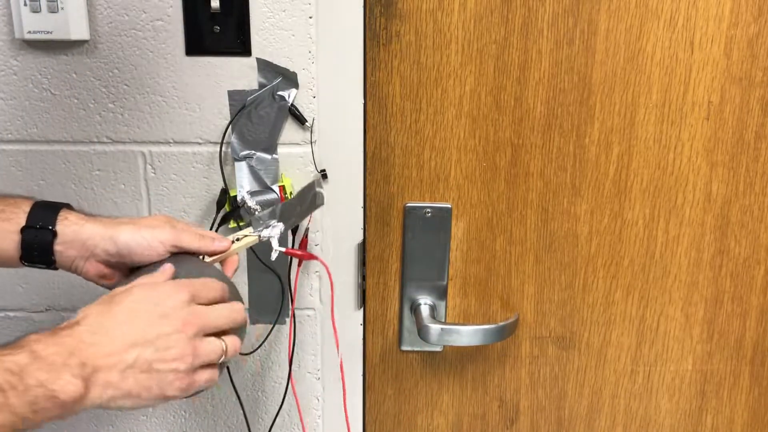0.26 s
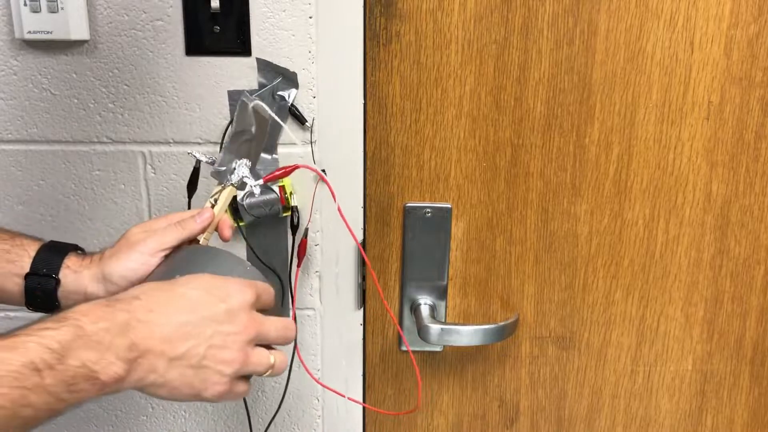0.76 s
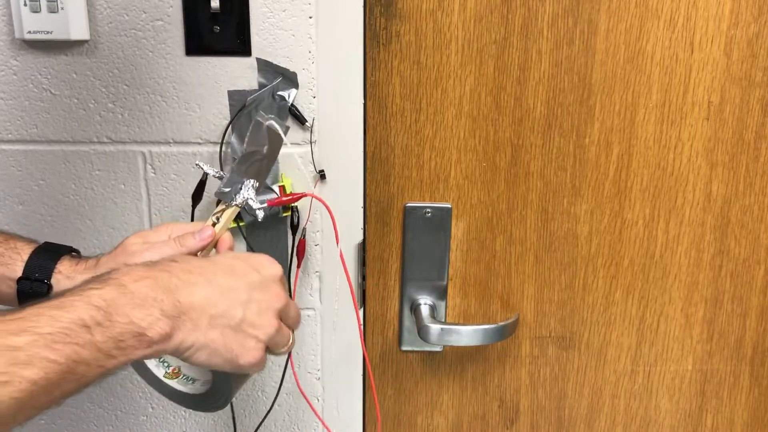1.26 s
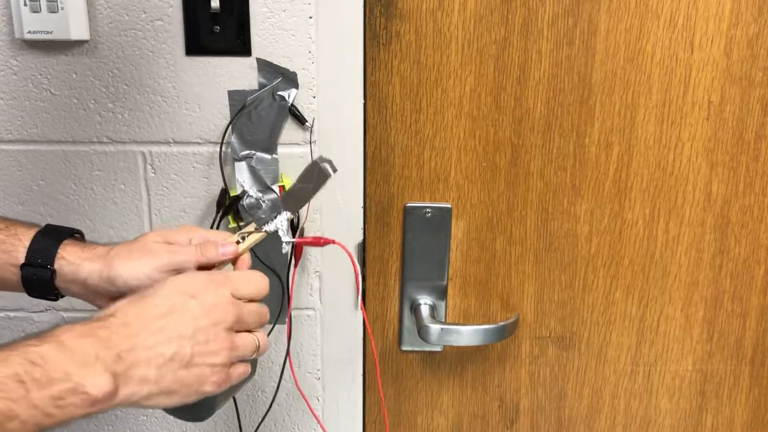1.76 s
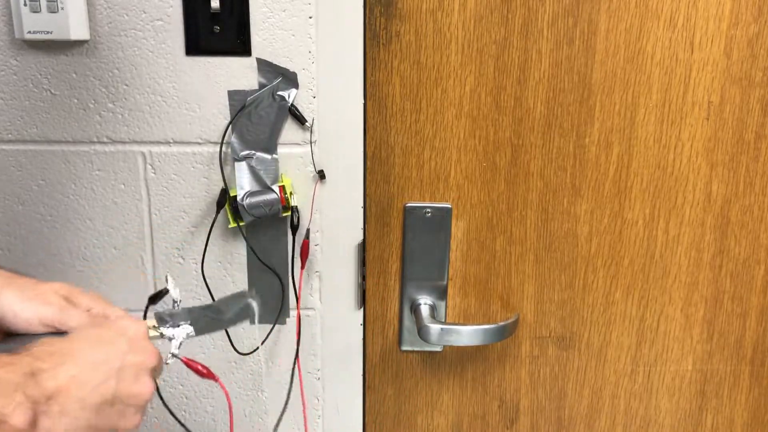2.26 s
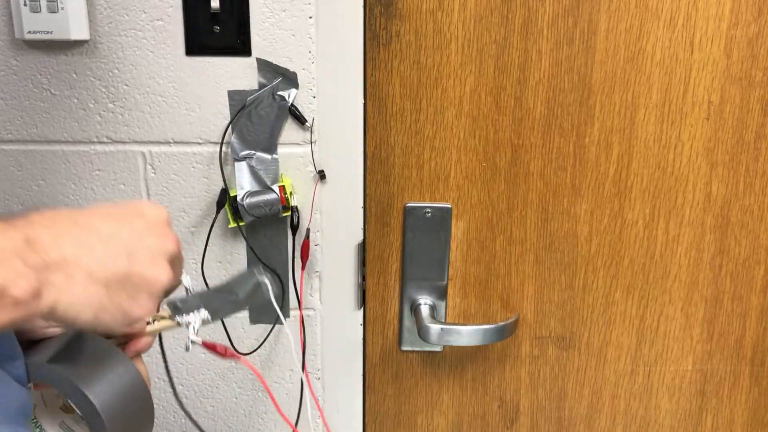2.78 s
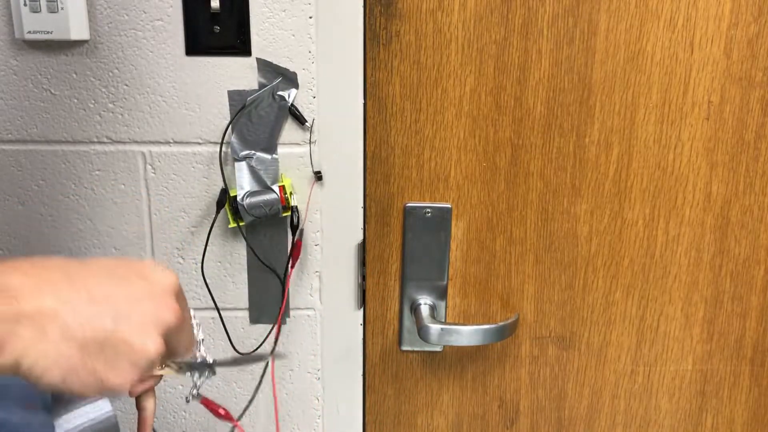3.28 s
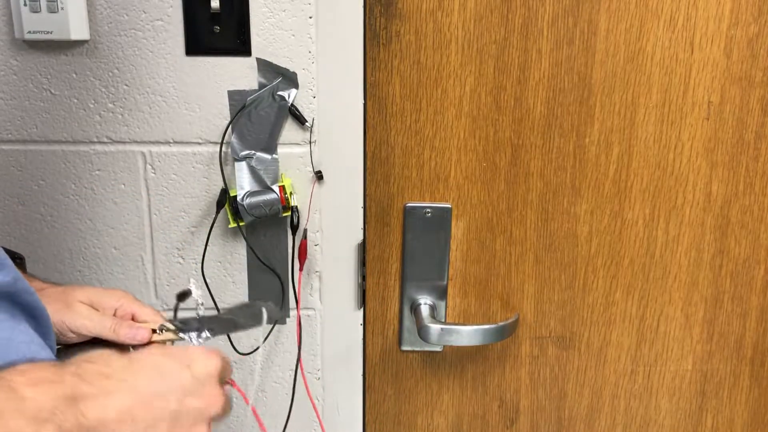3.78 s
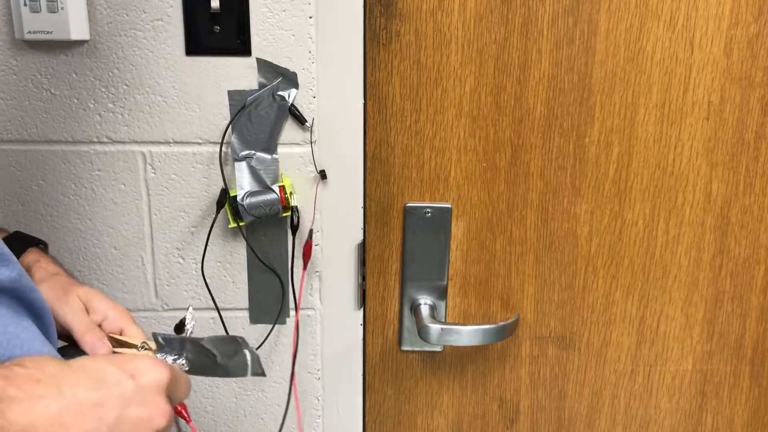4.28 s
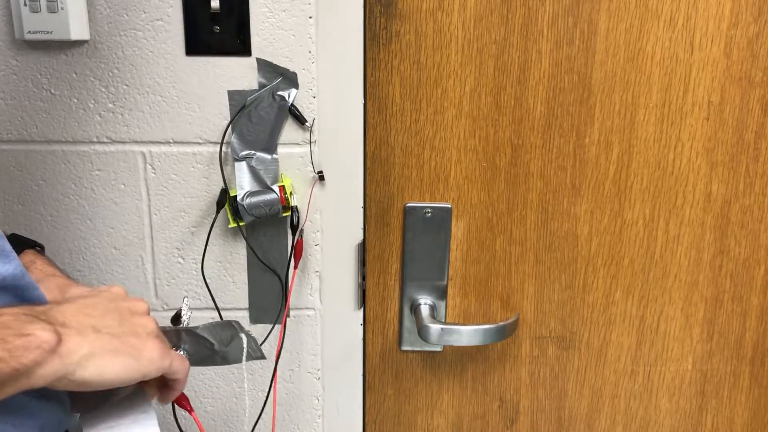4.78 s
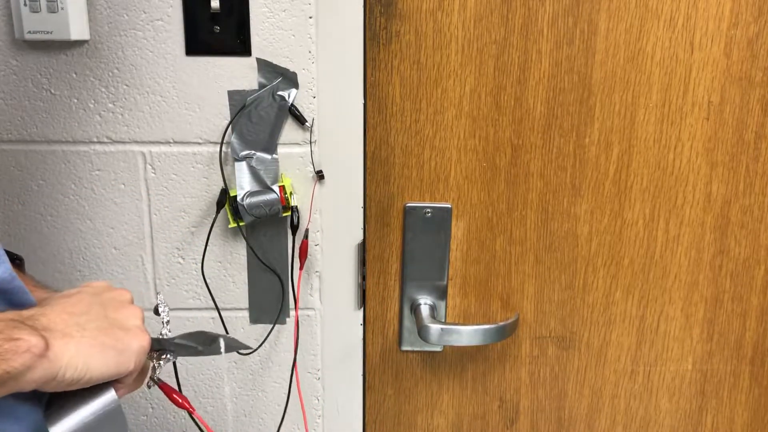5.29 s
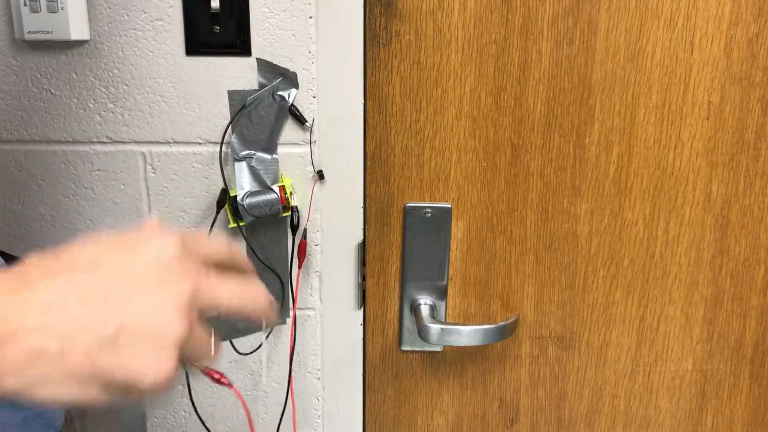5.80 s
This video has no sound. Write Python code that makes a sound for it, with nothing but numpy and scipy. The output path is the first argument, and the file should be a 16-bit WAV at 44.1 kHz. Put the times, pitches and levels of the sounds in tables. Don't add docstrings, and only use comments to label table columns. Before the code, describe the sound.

Cloth tape peels off its roll in short crackling rasps, growing to hard rips, over a low ventilation hum in an echoing corridor.

```python
import sys
import numpy as np
from scipy import signal
from scipy.fft import rfft, irfft
from scipy.io import wavfile
from scipy.ndimage import uniform_filter1d

SR = 44100
rng = np.random.default_rng(int(sys.argv[2]) if len(sys.argv) > 2 else 0)


def store_pcm(level_fs):
    pcm = np.round(np.clip(level_fs, -1, 1) * 32767).astype(np.int16)
    wavfile.write(sys.argv[1], SR, np.atleast_2d(pcm).T)


def decibels_to_gain(level_db):
    exponent = np.asarray(level_db, float) / 20
    return 10 ** exponent


N = 266496


def rms_one(x):
    return x / np.sqrt(np.mean(x ** 2) + 1e-20)


def band(x, low_hz, high_hz):
    edges_hz = [low_hz, min(high_hz, .45 * SR)]
    return signal.sosfilt(signal.butter(2, edges_hz, "band", fs=SR, output="sos"), x)


def resonance(x, hz, width_hz):
    r = np.exp(-np.pi * width_hz / SR)
    zeros = np.array([1, 0, -1]) * (1 - r * r) / 2
    poles = [1, -2 * r * np.cos(2 * np.pi * hz / SR), r * r]
    return signal.lfilter(zeros, poles, x)


def drift(rate_hz, size=N):
    steps = rng.standard_normal(int(size * rate_hz / SR) + 2)
    return np.interp(np.arange(size) * rate_hz / SR, np.arange(len(steps)), steps)


def add(out, s, sound):
    at = round(s * SR)
    out[at:at + len(sound)] += sound[:N - at]


def pulls():
    # t/s, level/dB
    efforts = [
        [(1.58, -66.5), (1.606, -52), (1.634, -44.5), (1.65, -41)],
        [(1.645, -44.5), (1.685, -44.5), (1.7, -43)],
        [(2.3175, -42.5), (2.33, -50.5), (2.355, -53)],
        [(2.364, -45), (2.372, -49), (2.39, -51), (2.41, -60)],
        [(2.419, -45.5), (2.44, -37.5), (2.499, -31.5), (2.535, -42)],
        [(2.863, -34.5), (2.888, -30), (2.92, -33), (2.932, -45), (2.942, -34), (2.952, -42), (2.97, -53)],
        [(3.232, -38), (3.24, -37), (3.272, -33), (3.295, -43.5), (3.305, -36), (3.325, -52), (3.346, -51.5),
         (3.36, -66)],
        [(4.1245, -47), (4.136, -45), (4.154, -55), (4.24, -68.5)],
        [(5.565, -52), (5.581, -35), (5.613, -26), (5.651, -27), (5.67, -30.5)],
    ]
    # f/Hz, width/Hz, level/dB
    strips = [
        [(6930, 420, 8.5)],
        [(3800, 890, 4)],
        [(4470, 750, 13)],
        [(6000, 1200, -4)],
        [(500, 220, 0), (1136, 320, 8), (4200, 670, -9)],
        [(278, 63, 10), (1105, 300, 9), (1360, 250, 10.5)],
        [(228, 75, 4.5), (1040, 110, 1), (1430, 440, 8)],
        [(5650, 250, -9)],
        [(970, 73, -8), (2860, 130, -3), (4300, 150, 0)],
    ]
    # boom at start/dB, boom at end/dB,
    # middle at start/dB, middle at end/dB, sizzle at start/dB
    colours = [(-36, -23, -28, -12, 10.5), (-16, -10, -8, -19, 2.5), (-15, 7, -3, -4, 9),
               (-20, -20, -27, -20, 8), (-32.5, 3.5, -9.5, -7, -1), (-10, 9.5, -1.5, -2.5, -0.5),
               (-10.5, 14, 5.5, -0.5, 5), (-19, -3, -2, 3, 2), (-22.5, -15, 0.5, -14.5, -2.5)]
    # start t/s, peak t/s, end t/s, peak level/dB, ring f/Hz
    light_tugs = [(3.506, 3.517, 3.54, -54, 4300), (3.568, 3.589, 3.615, -56.5, 6920),
                  (4.501, 4.535, 4.575, -52.5, 4460), (4.88, 4.969, 5.08, -69.5, 5500),
                  (2.1, 2.155, 2.22, -71.5, 4000), (5.859, 5.911, 5.94, -49.5, 2600)]
    tug_swell_db, tug_colour = 25, (-12, -1, -6, -0.5, 3)
    tug_width_hz, tug_ring_db = 270, -5
    slips_per_s, clump_rate_hz = 9000, 348.4
    uneven_db, uneven_end_db = 4.5, 3.5
    sizzle_loss_db = 9.5
    bite_s, let_go_s = 0.0029, 0.013

    strokes = list(zip(efforts, colours, strips))
    for start, peak, end, db, hz in light_tugs:
        effort = [(start, db - tug_swell_db), (peak, db), (end, db - tug_swell_db)]
        strokes.append((effort, tug_colour, [(hz, tug_width_hz, tug_ring_db)]))
    out = np.zeros(N)
    for effort, (boom_db, boom_end_db, mid_db, mid_end_db, top_db), modes in strokes:
        s, level_db = np.transpose(effort)
        t = np.arange(s[0], s[-1], 1 / SR)
        freed = (t - s[0]) / (s[-1] - s[0])
        spread_db = uneven_db + (uneven_end_db - uneven_db) * freed
        chance = np.minimum(rng.exponential(1, len(t)), 4) + 0.55 * drift(clump_rate_hz, len(t))
        slips = decibels_to_gain(spread_db * chance) * rng.choice([-1, 1], len(t))
        slips = slips * (rng.random(len(t)) < slips_per_s / SR)
        slips = slips / np.sqrt(uniform_filter1d(slips ** 2, size=600) + 1e-9)
        slips = slips + sum(resonance(slips, hz, width) * decibels_to_gain(db) for hz, width, db in modes)
        parts = [(213, 774, boom_db + (boom_end_db - boom_db) * freed),
                 (845, 3620, mid_db + (mid_end_db - mid_db) * freed),
                 (2410, 6700, 0),
                 (6500, 14300, top_db - sizzle_loss_db * freed)]
        effort_db = np.interp(t, s, level_db)
        pull = np.zeros(len(t))
        for k, (low_hz, high_hz, rel_db) in enumerate(parts):
            sign = (-1) ** k
            pull += sign * rms_one(band(slips, low_hz, high_hz)) * decibels_to_gain(effort_db + rel_db)
        fade = np.clip(np.minimum((t - s[0]) / bite_s, (s[-1] - t) / let_go_s), 0, 1)
        add(out, s[0], pull * fade * decibels_to_gain(-1.5))
    return out


def snap(ring_hz, low_db, top_db, t60, crackle_db):
    t = np.arange(round(.1 * SR)) / SR
    crack = decibels_to_gain(-60 * t / 0.0036)
    crackle = decibels_to_gain(crackle_db - 60 * t / max(t60, .003))
    burst = rng.standard_normal(len(t)) * (crack + crackle)
    burst[0] = 2.0
    body = band(burst + decibels_to_gain(13.5) * resonance(burst, ring_hz, 0.26 * ring_hz), 1870, 9600)
    thud, edge = -band(burst, 840, 1660), -band(burst, 8800, 23000)
    return sum(p / np.abs(p).max() * decibels_to_gain(db) for p, db in [(body, 0), (thud, low_db), (edge, top_db)])


def snaps():
    # t/s, peak level/dB, ring f/Hz, level over 9 kHz relative to body/dB
    lone = [(0.071, -37.5, 7500, 7), (0.2378, -37.5, 4170, -33), (1.397, -47.5, 7500, -2),
            (1.478, -48.5, 8350, 7), (1.984, -29, 7000, 0.5), (2.3878, -32, 9000, -1),
            (2.3182, -27.5, 4800, -20), (2.363, -36, 5700, -25), (2.6332, -37, 4550, -4),
            (3.2336, -25, 2210, -19), (3.3346, -21, 4300, -4), (3.5174, -37, 4100, -22),
            (3.595, -38, 7160, -5), (4.103, -36.5, 2340, -36), (4.1254, -26, 5270, 3),
            (4.5357, -35.5, 3330, -20.5), (5.2605, -48.5, 4500, -5), (5.2902, -45, 2840, -11),
            (5.445, -36.5, 3070, -17), (5.5215, -30, 3160, -17), (5.5468, -30, 2950, -15),
            (5.787, -48.5, 9000, 15.5), (5.8117, -41, 8100, 3), (5.8162, -34.5, 9500, 8),
            (5.8653, -39, 5870, -13), (5.959, -30, 5250, 0), (5.9654, -27, 3730, -1)]
    # t/s, peak level/dB, ring f/Hz
    faint = [(0.0044, -54.5, 8740), (0.2, -50, 3930), (1.519, -53, 8450), (1.5402, -50, 8500),
             (1.5488, -46, 8460), (1.573, -49, 7200), (2.8352, -47, 5680), (3.9182, -49, 2260),
             (4.8145, -56, 2120), (4.931, -57, 6550), (5.0521, -60, 4330), (5.091, -51, 3630),
             (5.4841, -51, 2060), (5.5, -45, 5150)]
    # t/s, peak level/dB, ring f/Hz
    strong = [(1.663, -29, 3440), (1.6812, -27.5, 3960), (2.3308, -33, 4170), (2.4837, -24, 4800),
              (2.501, -21, 6500), (2.5045, -17.5, 4700), (2.51, -14.5, 5330), (2.866, -26, 8300),
              (2.8761, -21, 6800), (2.886, -14, 3615), (2.8988, -16, 3910), (2.9063, -23, 7800),
              (2.9096, -12, 7900), (2.917, -11, 4000), (2.937, -17, 4500), (2.9424, -15.5, 3840),
              (2.9441, -11.5, 4000), (3.2676, -19, 6500), (3.272, -19.5, 6700), (3.2833, -15.5, 3800),
              (3.3005, -19, 4300), (3.3051, -14.5, 4100), (4.1346, -13.5, 5540), (5.5944, -25, 4030),
              (5.5962, -12, 3900), (5.6022, -13, 4900), (5.6091, -4.5, 3120), (5.6231, -6.5, 4600),
              (5.642, -32, 4000), (5.6463, -8, 4200)]
    # start t/s, gap/s, first level/dB, last level/dB, ring f/Hz
    tick_runs = [
        (1.581, 0.0047, -50, -43, 7050),
        (2.367, 0.005, -36, -40, 6000),
        (2.842, 0.0042, -48, -35, 6500),
        (5.5647, 0.0032, -26, -25, 7800),
    ]

    def thud_db(hz):
        return -19 - 6.5 * np.log2(hz / 5000)

    def edge_db(hz):
        return -3.5 + 10 * np.log2(hz / 5000)

    out = np.zeros(N)
    for s, peak_db, hz, top_db in list(lone) + [(*tick, edge_db(tick[2])) for tick in faint]:
        add(out, s, decibels_to_gain(peak_db) * snap(hz, thud_db(hz), top_db, t60=0.044, crackle_db=-11.5))
    short = list(strong)
    for s, gap, first_db, last_db, hz in tick_runs:
        for k in range(6):
            peak_db = first_db + (last_db - first_db) * k / 5 + rng.normal(0, 3)
            short.append((s + gap * (k + rng.uniform(-.3, .3)), peak_db, hz))
    for s, peak_db, hz in short:
        add(out, s, decibels_to_gain(peak_db - 5.0) * snap(hz, thud_db(hz), edge_db(hz), t60=0.016, crackle_db=-18))
    return out


def knocks():
    # t/s, peak level/dB, f/Hz, width as share of f, t60/s
    hits = [(0.069, -46, 2500, 1.5, 0.032), (0.237, -45.5, 1280, 1.6, 0.13),
            (1.628, -35.5, 1640, 0.17, 0.027), (2.338, -44, 590, 0.65, 0.06), (2.5, -38.5, 500, 1.05, 0.15),
            (2.52, -41.5, 279, 0.43, 0.14), (2.9, -40, 270, .6, .15), (3.27, -41, 219, 0.86, 0.14),
            (5.288, -51, 1500, 1, .05), (3.345, -44, 447, 0.69, .15), (3.796, -54.5, 1780, 1.2, 0.23),
            (5.592, -22, 1580, 0.42, 0.012), (5.892, -45, 1600, 1.5, .04), (5.916, -47, 1600, 1.5, 0.034),
            (5.966, -32.5, 960, 1.34, 0.025)]
    rise_s = 0.0027
    out, t = np.zeros(N), np.arange(round(.25 * SR)) / SR
    for s, peak_db, hz, share, t60 in hits:
        puff = rng.standard_normal(len(t)) * decibels_to_gain(-60 * t / t60) * np.minimum(t / rise_s, 1)
        knock = resonance(resonance(puff, hz, share * hz), hz, share * hz)
        add(out, s, decibels_to_gain(peak_db) * knock / np.abs(knock).max())
    return out


def pings():
    # t/s, peak level/dB, f/Hz
    brushes = [(3.141, -47.5, 2750), (3.459, -48, 2760), (3.485, -51, 2860), (4.061, -48, 2750),
               (4.218, -40.5, 2720), (4.4279, -48, 2720), (4.592, -53.5, 2700), (5.7946, -45.5, 2760)]
    out, t = np.zeros(N), np.arange(round(.08 * SR)) / SR
    for s, peak_db, hz in brushes:
        brush = rng.standard_normal(len(t)) * decibels_to_gain(-60 * t / 0.05)
        ping = resonance(brush, hz, 250) + decibels_to_gain(-15) * resonance(brush, 1.27 * hz, 900)
        add(out, s, decibels_to_gain(peak_db) * ping / np.abs(ping).max())
    return out


def rustle():
    # t/s, level/dB
    fingers = [(0.0, -75), (1.46, -75.5), (1.8, -73.5), (2.3, -74), (2.47, -54), (2.64, -66), (2.89, -74.5),
               (3.03, -70), (3.13, -61), (3.41, -67), (3.57, -65), (4.02, -69.5), (4.67, -75.5),
               (5.37, -73), (5.62, -72), (5.77, -69), (5.92, -56.5), (6.04, -76)]
    sleeve_s, sleeve_length_s, sleeve_db = 1, .3, -73
    bright_db, bright_follows = -75, 1.03
    t = np.arange(N) / SR
    busy_db = np.interp(t, *np.transpose(fingers))
    sleeve = decibels_to_gain(sleeve_db) * np.exp(-((t - sleeve_s) / sleeve_length_s) ** 2)
    flicker_db = 1.3 * drift(18) + 1.2 * rng.exponential(1, N)
    grains = rng.standard_normal((2, N)) * decibels_to_gain(flicker_db)
    ticks = (rng.random(N) < 8 / SR) * decibels_to_gain(25 + 3 * rng.standard_normal(N))
    bright = rms_one(band(grains[1], 5200, 14600)) + band(ticks, 7000, 16000)
    bright = bright - .5 * resonance(bright, 10600, 1500)
    dull = rms_one(band(grains[0], 740, 4130)) * np.hypot(decibels_to_gain(busy_db), sleeve)
    return dull + bright * decibels_to_gain(bright_db + bright_follows * (busy_db + 72))


def corridor(x):
    # f/Hz, t60/s
    decay = [(300, 0.36), (1200, 0.23), (3500, 0.23), (8000, 0.23), (13000, 0.19)]
    t = np.arange(round(.5 * SR)) / SR
    noise = rng.standard_normal(len(t))
    tail = np.zeros(len(t))
    for k, (hz, t60) in enumerate(decay):
        tail += (-1) ** k * band(noise, hz / 2.19, hz * 2.02) * decibels_to_gain(-60 * t / t60)
    tail = tail * np.clip((t - .002) / 0.00067, 0, 1)
    return signal.fftconvolve(x, tail / np.sqrt(np.sum(tail ** 2)))[:N]


def surges():
    # t/s, peak level/dB
    gusts = [(.25, -40), (.7, -44.5), (.94, -44.5), (1.1, -46), (1.27, -46), (1.47, -42.5), (1.6, -49),
             (1.75, -46), (2.02, -43.5), (2.26, -47.5), (2.57, -44), (2.88, -44), (3.09, -43.5),
             (3.32, -43.5), (3.58, -42.5), (3.95, -43.5), (4.18, -41.5), (4.4, -44.5), (4.67, -45),
             (4.98, -48.5), (5.22, -42), (5.53, -44.5), (5.74, -50), (5.97, -47.5)]
    half_length_s, lull_db = 0.088, -56
    t = np.arange(0, N, 100) / SR
    swell = decibels_to_gain(lull_db) + sum(decibels_to_gain(db - 3) * np.exp(-((t - s) / half_length_s) ** 2) for s, db in gusts)
    return np.interp(np.arange(N) / SR, t, swell)


def ventilation():
    # f/Hz, level per Hz/dB
    air = [(18, -22), (30, -10.5), (53, -6.5), (88, -1.5), (131, -4.5), (210, -13), (426, -24.5),
           (526, -28.5), (780, -34), (1010, -31.5), (1670, -42.5), (2830, -53), (10200, -70), (13300, -54),
           (16000, -55)]
    # f/Hz, width/Hz, rms level/dB
    ducts = [(57.4, 6.94, -46.5), (154.5, 18.8, -55.5)]
    # f/Hz, rms level/dB
    motor = [(122, -49), (180, -75.5), (245, -71.5), (520, -82.5)]
    hz = np.maximum(np.fft.rfftfreq(N, 1 / SR), 1)
    air_hz, air_db = np.transpose(air)
    shape = decibels_to_gain(np.interp(np.log(hz), np.log(air_hz), air_db))
    out = decibels_to_gain(-54) * rms_one(irfft(rfft(rng.standard_normal(N)) * shape, N))

    (low_hz, low_width, low_db), (duct_hz, width, duct_db) = ducts
    wander = 2 * np.pi * np.cumsum(low_hz + low_width * 0.198 * drift(11)) / SR
    flutter = decibels_to_gain(low_db + 46.5 + 1.2 * drift(14))
    out += np.sqrt(2) * surges() * flutter * np.sin(wander)
    duct = resonance(resonance(rng.standard_normal(N), duct_hz, width), duct_hz, width)
    out += decibels_to_gain(duct_db) * rms_one(duct)

    for line_hz, line_db in motor:
        phase = 2 * np.pi * line_hz * np.arange(N) / SR + 0.23 * drift(6.0)
        out += np.sqrt(2) * decibels_to_gain(line_db + 1.5 * drift(5)) * np.sin(phase)
    return out


def scene():
    wall_s, wall_db = .005, -12.5
    corridor_db, ping_room_db = -8, -5
    tape = pulls() + snaps() + knocks()
    clip = pings()
    near = tape.copy()
    add(near, wall_s, decibels_to_gain(wall_db) * tape)
    echo = decibels_to_gain(corridor_db) * corridor(tape + decibels_to_gain(ping_room_db) * clip)
    return (near + echo + clip + rustle() + ventilation())[None]


def top_cut(x):
    return signal.sosfilt(signal.butter(12, 16830, fs=SR, output="sos"), x)


def record(dry):
    low_pass = signal.cheby2(10, 30, 16200, fs=SR, output="sos")
    return top_cut(signal.sosfilt(low_pass, dry))


dry = scene()
out = record(dry)
store_pcm(out)
```